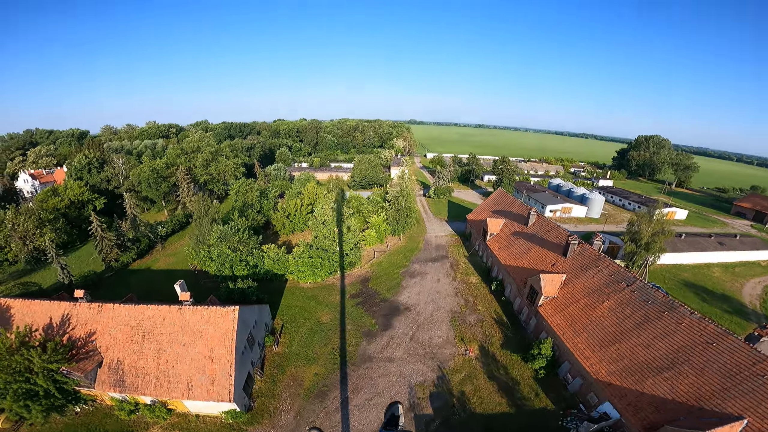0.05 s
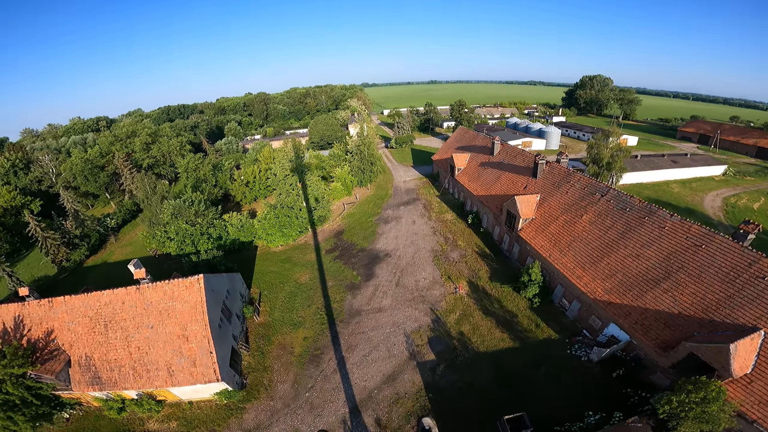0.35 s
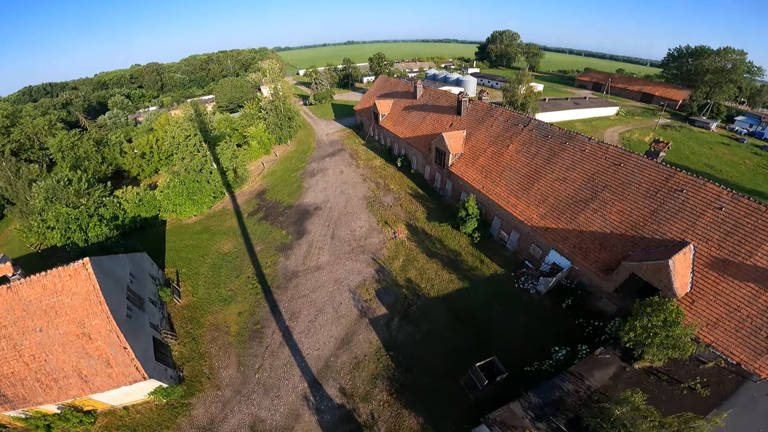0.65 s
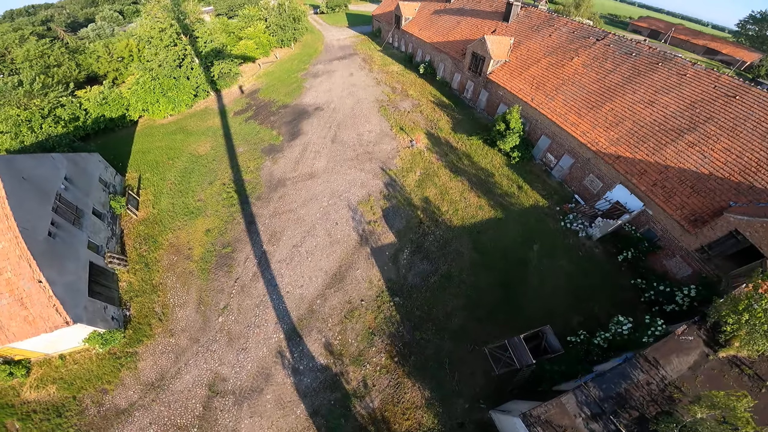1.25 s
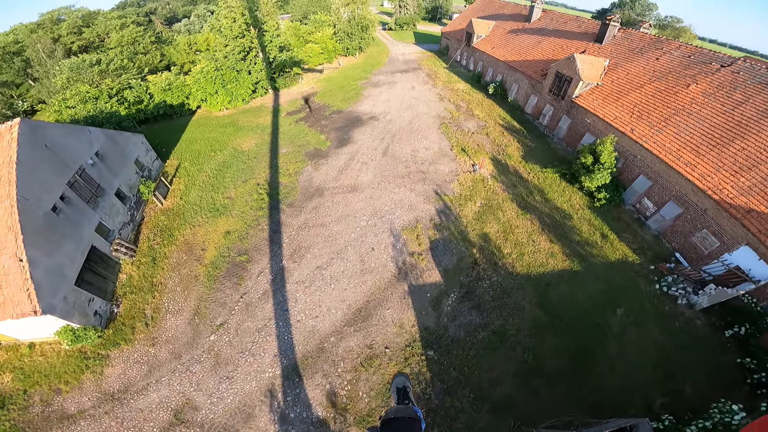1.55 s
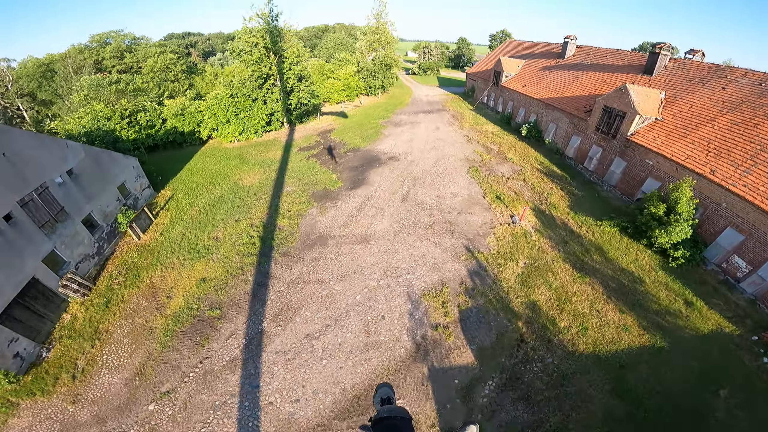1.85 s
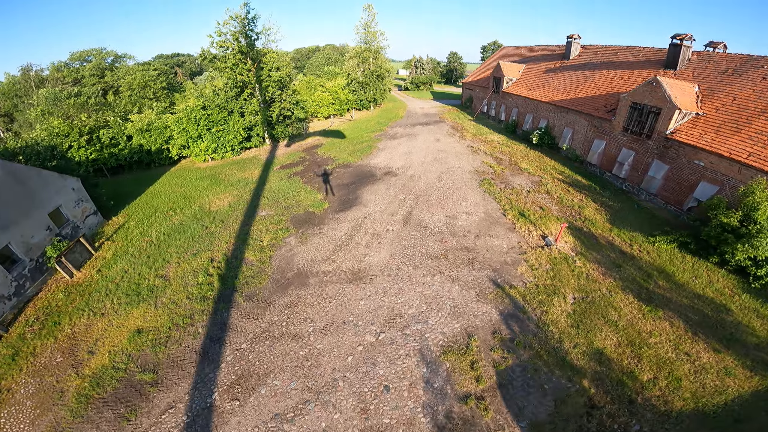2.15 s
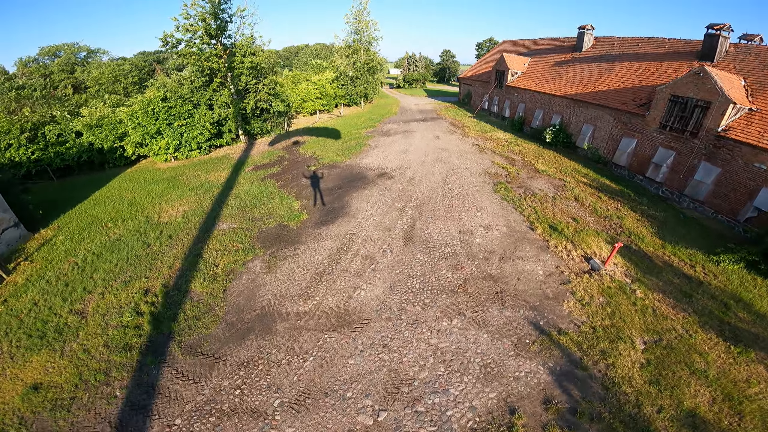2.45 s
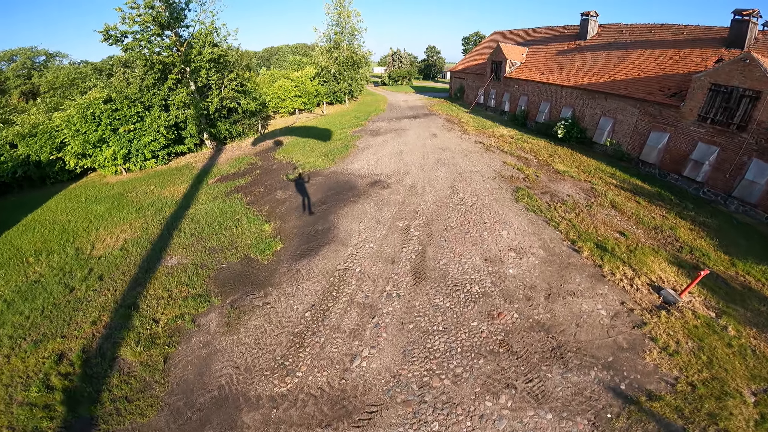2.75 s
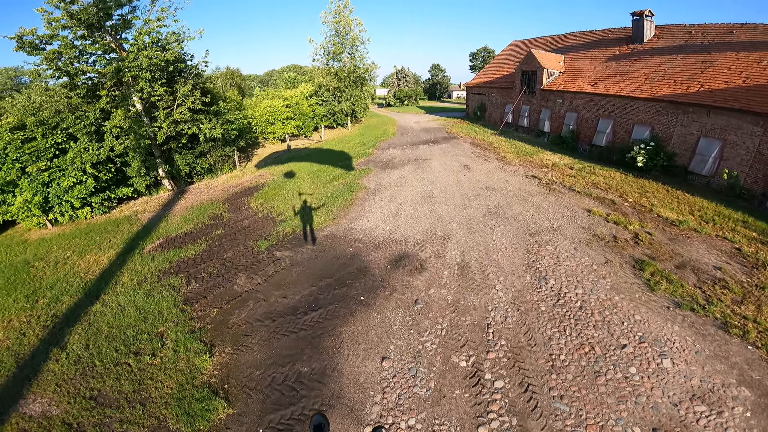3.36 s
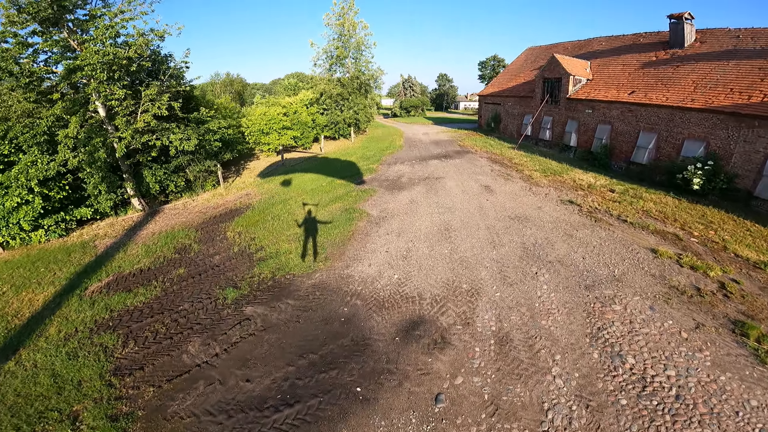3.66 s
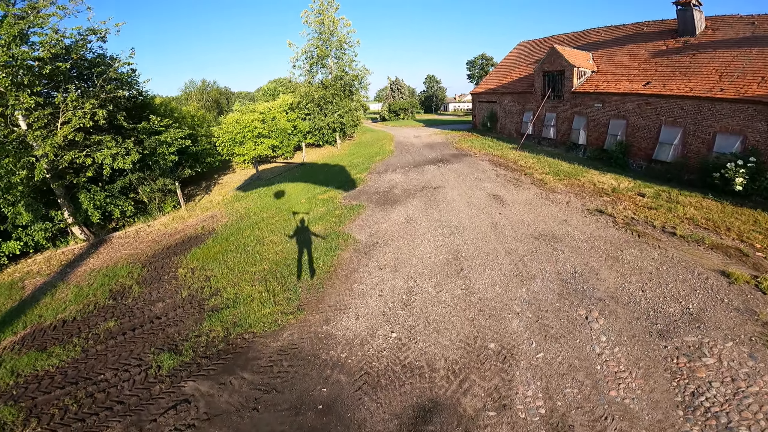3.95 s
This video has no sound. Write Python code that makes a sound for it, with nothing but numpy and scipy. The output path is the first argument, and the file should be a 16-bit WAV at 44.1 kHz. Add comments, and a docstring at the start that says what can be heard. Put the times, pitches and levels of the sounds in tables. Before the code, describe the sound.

Wind buffets a microphone worn by a descending parachutist, rumbling for all four seconds with dull thumps, thickest in the first second. During that second nylon flutters, flaps and swishes, a buckle clinks lightly, and harness fittings knock sharply around 0.8 seconds. Faint ticks and cloth crackles follow in a calmer stretch. The wind swells again near 2 seconds, then eases into a softer rush with scattered thumps.

```python
"""Wind thumps and buffets a microphone worn by a parachutist gliding down to land.
Turbulent eddies press on it as a rumble and as dull slaps; their wakes tear and hiss with the gusts.
Mostly in the first second, nylon flutters, flaps and swishes by stick-slip friction,
lines tick, a buckle clinks, stiff cloth crackles and harness fittings knock in damped modes."""
import sys
import numpy as np
from scipy import signal
from scipy.fft import rfft, irfft
from scipy.io import wavfile
from scipy.ndimage import uniform_filter1d

SR = 44100
rng = np.random.default_rng(int(sys.argv[2]) if len(sys.argv) > 2 else 0)


def wav_out(sig):
    """Save sig, one row per channel (or a flat mono array), as 16-bit PCM at SR to the path in sys.argv[1]."""
    wavfile.write(sys.argv[1], SR, np.round(np.clip(np.atleast_2d(sig).T, -1, 1) * 32767).astype(np.int16))


N = 176400

# Pressure of the large eddies: time_s, level_db
RUMBLE_LEVEL = [(0, -15.5), (.25, -18.5), (.5, -20), (.85, -21), (1.25, -19), (1.9, -19), (2.6, -19.5),
                (3.3, -18.5), (4, -20.5)]
# Spectrum of the large eddies: frequency_hz, density_db
RUMBLE_SPECTRUM = [(10, -16), (22, -2), (42, 0), (80, -2), (120, -5.5), (180, -14), (280, -26),
                   (500, -51.5), (1200, -93.5)]
# Strength of the gusts: time_s, level_db
GUST_LEVEL = [(0, -36), (.17, -20.5), (.33, -25), (.43, -29), (.5, -33), (.63, -29.5), (.78, -35),
              (.92, -33.5), (1.08, -40.5), (1.42, -37.5), (1.58, -29.5), (2.03, -25), (2.35, -30),
              (3.0, -36.5), (3.5, -34), (3.68, -41), (4, -38)]
# Spectrum of the finer turbulence: frequency_hz, density_db
BUFFET_SPECTRUM = [(50, 0), (130, 0.5), (280, 4), (450, -4), (750, -14.5), (1400, -23), (3000, -36),
                   (6000, -42), (12000, -66)]
# Rush of air past the body, before its tilt: time_s, level_db
RUSH_LEVEL = [(0, -28.5), (.3, -41), (.45, -34), (.9, -40.5), (1.1, -49.5), (1.43, -50.5), (1.65, -45),
              (2.0, -41), (2.6, -39.5), (2.8, -40.5), (3.1, -40.5), (3.3, -43.5), (3.47, -42),
              (3.65, -47.5), (4, -49)]
# Tilt added to the rush about 1 kHz: time_s, slope_db_per_octave
RUSH_SLOPE = [(0, -4.5), (1.2, 1.5), (1.65, 2.5), (2.1, -1), (2.7, -2.1), (4, -1.2)]
# Spectrum of the rush: frequency_hz, density_db
RUSH_SPECTRUM = [(200, -5.5), (500, 1.5), (1000, -2.5), (1400, -6.5), (2100, -11), (3000, -12.5),
                 (4200, -17), (5700, -18.5), (8000, -30), (11000, -41), (15000, -90)]
# Fabric fluttering in the airstream: peak_s, level_db, rise_s, fall_s
FLUTTER_SWELLS = [(.018, -24, .007, 0.0047), (.11, -28, 0.056, .04), (.245, -29.5, 0.083, 0.13),
                  (.305, -30.5, 0.021, 0.058), (.535, -37, 0.013, 0.038), (.6, -35, 0.0037, .005),
                  (.71, -33, 0.022, 0.012)]
# Spectrum of the flutter: frequency_hz, density_db
FLUTTER_SPECTRUM = [(300, 5.5), (800, 4.5), (1600, -0.5), (3300, -6.5), (5500, -17.5), (8000, -27),
                    (11000, -39), (15000, -79)]
# Slaps of air on the microphone: peak_s, level_db
AIR_SLAPS = [(0.021, -12), (.087, -21), (0.146, -18.5), (0.176, -15), (0.255, -16), (0.33, -15),
             (0.511, -16.5), (.645, -22.5), (0.657, -13), (.73, -17.5), (0.763, -20), (0.849, -13.5),
             (.934, -16), (.968, -20), (1.088, -23), (1.446, -26.5), (1.865, -19.5), (1.969, -21),
             (2.035, -16), (2.211, -19.5), (2.935, -18.5), (3.574, -20.5), (3.824, -20.5)]
# Spectrum of a slap: frequency_hz, density_db
SLAP_SPECTRUM = [(60, -16), (125, 7), (190, 4.5), (300, -9.5), (600, -28.5), (1100, -43), (3000, -53.5),
                 (10000, -83.5)]
# Single flaps of cloth: peak_s, level_db, pitch_hz, rise_and_fall_s
CLOTH_FLAPS = [(.076, -21, 480, .007), (.16, -19, 450, .008), (.195, -21, 450, .008), (.24, -19, 450, .009),
               (.311, -19, 380, .005), (.3695, -17, 560, .0035), (.418, -24.5, 500, .004),
               (.51, -18, 350, .005), (.62, -22.5, 520, .005), (.648, -22, 320, .012),
               (.742, -24.5, 380, .005), (1.862, -27, 720, .003), (2.085, -23, 340, .012)]
# Spectrum of a flap: pitch_ratio, density_db
FLAP_SPECTRUM = [(.25, -16), (.55, 0), (1, 1.5), (1.45, -9.5), (2.3, -21.5), (6, -39.5), (20, -85)]
# Nylon sliding on nylon: peak_s, level_db, rise_s, fall_s, rasp_depth_db, pitch_hz
NYLON_SWISHES = [(.085, -52, 0.021, 0.03, -1, 5600), (.235, -41.5, 0.053, 0.079, 14, 5900),
                 (.56, -40.5, 0.074, 0.05, 15, 6360), (.604, -32.5, 0.016, 0.025, 19, 5840),
                 (.814, -34, 0.037, 0.035, 4, 6370), (.893, -46.5, .012, 0.038, -2, 6550)]
# Spectrum of a swish: pitch_ratio, density_db
SWISH_SPECTRUM = [(.09, -0.5), (.25, -6.5), (.58, -6.5), (.8, -3), (1, -3), (1.25, -11.5), (1.55, -19.5),
                  (2.05, -33.5), (2.6, -50)]
# Small impacts of lines and buckles: start_s, level_db, relative_body_db
LINE_TICKS = [(.134, -31, -10), (.234, -29, -10), (1.0125, -29, -6), (1.281, -44, 2), (1.304, -48, 12),
              (1.341, -46, -5), (3.08, -39, 8), (3.399, -42, 7)]
# Spectrum of the bright snap in ticks and knocks: frequency_hz, density_db
SNAP_SPECTRUM = [(400, -2), (1400, 9.5), (3500, 10), (5700, 2.5), (8000, -12), (11000, -27), (15000, -50)]
# Spectrum of a tick's dull body: frequency_hz, density_db
TICK_BODY_SPECTRUM = [(300, -6), (800, -2), (1400, 8), (2300, -20), (4000, -25.5), (12000, -53)]
# Crackles of stiff cloth: start_s, level_db
CLOTH_CRACKLES = [(.181, -37), (.249, -39), (1.381, -46), (1.401, -48), (1.462, -53), (1.69, -46),
                  (2.775, -51)]
# Spectrum of a crackle: frequency_hz, density_db
CRACKLE_SPECTRUM = [(2000, -4), (6000, 0), (9000, -4), (12500, -25), (15000, -42)]
# Impacts of harness fittings: start_s, level_db, relative_thud_db, relative_crack_db
FITTING_KNOCKS = [(0.7897, -16, -28, -16), (.845, -16.5, -3, -6), (0.851, -27, -6, -4), (0.864, -39, -4, 4)]
# Modes of a fitting: frequency_hz, relative_level_db, t60_s
FITTING_MODES = [(1280, -10, 0.039), (1486, 9, 0.0083), (1870, -6, 0.01), (2530, -13, 0.012)]

TIME_S = np.arange(N) / SR
BIN_HZ = np.arange(N // 2 + 1) * SR / N


def undb(db):
    """Convert decibels to an amplitude ratio."""
    return 10 ** (np.asarray(db) / 20)


def unit(x):
    """Normalise to rms 1."""
    return x / np.sqrt(np.mean(x ** 2))


def curve(rows):
    """Interpolate (time_s, value) rows linearly."""
    return np.interp(TIME_S, *np.array(rows).T)


def colour(x, spectrum):
    """Filter by spectral weighting, to rms 1."""
    hz, db = np.array(spectrum).T
    gain = undb(np.interp(np.log(np.maximum(BIN_HZ, 1)), np.log(hz), db))
    return unit(irfft(rfft(x) * gain, N))


def noise(spectrum):
    """Coloured Gaussian noise of rms 1."""
    return colour(rng.standard_normal(N), spectrum)


def tuned(spectrum, pitch_hz):
    """Transpose a spectrum of ratios to a pitch."""
    return [(ratio * pitch_hz, db) for ratio, db in spectrum]


def walk(rate_hz):
    """Low-pass noise wanders smoothly with rms 1."""
    return unit(irfft(rfft(rng.standard_normal(N)) / (1 + (BIN_HZ / rate_hz) ** 4), N))


def even(x, window_s=.004, share=.9):
    """Envelope compression evens out the strength of a noise by a share of 0-1."""
    power = abs(signal.hilbert(x)) ** 2
    strength = uniform_filter1d(uniform_filter1d(power, int(window_s * SR)), int(window_s * SR / 2))
    return unit(x / strength ** (share / 2))


def swells(rows):
    """Envelopes that rise to a peak and fall add in power, as incoherent sources do."""
    power = 0
    for peak_s, db, rise_s, fall_s in rows:
        distance = abs(TIME_S - peak_s) / np.where(TIME_S < peak_s, rise_s, fall_s)
        power += undb(db) ** 2 * np.exp(-2 * distance ** 1.3)
    return np.sqrt(power)


def decay(start_s, t60_s, attack_s=.001):
    """Damping gives an exponential decay after a quick attack."""
    age_s = np.maximum(TIME_S - start_s, 0)
    return np.minimum(age_s / attack_s, 1) * np.exp(-np.log(1000) * np.minimum(age_s / t60_s, 10))


def bursts(rows, t60_s=.026):
    """Superpose one decaying envelope per (start_s, level_db) row."""
    return sum(undb(db) * decay(start_s, t60_s) for start_s, db in rows)


def ring(start_s, hz, t60_s):
    """A struck mode vibrates as a damped sinusoid."""
    return np.sin(2 * np.pi * hz * (TIME_S - start_s)) * decay(start_s, t60_s)


def creases(spectrum, drive_db, per_s, spread_db):
    """Tiny random slips of woven cloth sum to shot noise, as strong as the cloth is driven."""
    slips = (rng.random(N) < per_s / SR) * rng.standard_normal(N)
    size_db = spread_db * np.minimum(rng.exponential(size=N), 4)
    return colour(slips * undb(drive_db + size_db), spectrum)


def rumble(eddies, surge_db=1.16):
    """Pressure fluctuations of large eddies thump on the microphone."""
    return eddies * undb(curve(RUMBLE_LEVEL) + surge_db * walk(rate_hz=4.9))


def buffet(eddies, depth_db=1, flicker_db=1.5):
    """In the turbulent cascade, each large eddy drives a burst of finer turbulence."""
    turbulence = noise(BUFFET_SPECTRUM) * undb(depth_db * eddies + flicker_db * walk(rate_hz=20.2))
    return unit(turbulence) * undb(curve(GUST_LEVEL))


def rush(eddies, depth_db=.44, flicker_db=1.13):
    """Broadband flow noise is modulated by the eddies; each octave flickers on its own."""
    air, slope = rfft(noise(RUSH_SPECTRUM)), curve(RUSH_SLOPE)
    octave = np.clip(np.log2(np.maximum(BIN_HZ, 1) / 1000), -2, 4)
    hiss = 0
    for centre in range(-2, 5):
        band = irfft(air * np.maximum(1 - abs(octave - centre), 0), N)
        hiss += band * undb(centre * slope + flicker_db * walk(rate_hz=26))
    return hiss * undb(curve(RUSH_LEVEL) + depth_db * eddies)


def wind(lull_s=.55, lull_half_width_s=.045, lull_db=-8.5):
    """One eddy pressure couples three noises; the upper two dip briefly, as if sheltered by cloth."""
    eddies = even(noise(RUMBLE_SPECTRUM), window_s=.028, share=.5)
    lull = undb(lull_db * np.exp(-((TIME_S - lull_s) / lull_half_width_s) ** 4))
    return lull * (buffet(eddies) + rush(eddies)) + rumble(eddies)


def flutter(depth_db=2):
    """Airflow drives fabric into irregular vibration, modulating its rustle."""
    rustle = creases(FLUTTER_SPECTRUM, depth_db * walk(rate_hz=70), per_s=9000, spread_db=3.5)
    return rustle * swells(FLUTTER_SWELLS)


def slaps(rise_s=.0084, fall_s=.01):
    """The strongest eddies strike the microphone as short, dull pressure pulses."""
    return even(noise(SLAP_SPECTRUM)) * swells([(at, db, rise_s, fall_s) for at, db in AIR_SLAPS])


def flaps():
    """Flapping cloth displaces air in brief bursts; a broad spectral peak makes them hollow."""
    return sum(even(noise(tuned(FLAP_SPECTRUM, hz))) * swells([(peak_s, db, edge_s, edge_s)])
               for peak_s, db, hz, edge_s in CLOTH_FLAPS)


def swishes(catch_hz=100, jitter=.35):
    """Stick-slip friction: nylon catches and slides in uneven cycles that give its hiss a rasp."""
    catch_phase = np.cumsum(catch_hz * (1 + jitter * walk(rate_hz=60))) / SR % 1
    out = 0
    for *swell, rasp_db, hz in NYLON_SWISHES:
        hiss = creases(tuned(SWISH_SPECTRUM, hz), -rasp_db * catch_phase, per_s=20000, spread_db=1.2)
        out += hiss * swells([swell])
    return out


def ticks(snap):
    """Light impacts of lines and buckles give damped transients: a bright snap over a dull body."""
    snap_envelope = bursts([(at, db) for at, db, _ in LINE_TICKS])
    body_envelope = bursts([(at, db + body_db) for at, db, body_db in LINE_TICKS])
    return snap * snap_envelope + even(noise(TICK_BODY_SPECTRUM)) * body_envelope


def clink(level_db=-21):
    """A small buckle, struck once, vibrates freely in one high mode."""
    return undb(level_db) * ring(start_s=.181, hz=3750, t60_s=.008)


def crackles():
    """Stiff cloth releases elastic energy in thin bursts of treble."""
    return noise(CRACKLE_SPECTRUM) * bursts(CLOTH_CRACKLES)


def knocks(snap):
    """Impact excites a fitting's damped modes, with a hollow thud and a noisy crack."""
    out = 0
    for start_s, db, thud_db, crack_db in FITTING_KNOCKS:
        modes = sum(undb(mode_db) * ring(start_s, hz, t60_s) for hz, mode_db, t60_s in FITTING_MODES)
        thud = undb(thud_db) * ring(start_s, hz=582, t60_s=.035)
        crack = undb(crack_db) * snap * decay(start_s, t60_s=.014)
        out += undb(db) * (modes + thud + crack)
    return out


def scene():
    """The pressures of air, cloth and harness superpose at one microphone."""
    air = wind() + slaps()
    cloth = swishes() + flutter() + flaps()
    snap = noise(SNAP_SPECTRUM)
    harness = ticks(snap) + clink() + knocks(snap)
    return (air + cloth + harness + crackles())[None]


def record(dry, cutoff_hz=15000):
    """The camera's limited bandwidth acts as a steep low-pass filter."""
    return signal.sosfilt(signal.ellip(8, .2, 70, cutoff_hz, fs=SR, output="sos"), dry)


dry = scene()
out = record(dry)
wav_out(out)
```